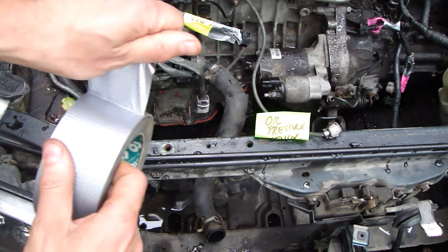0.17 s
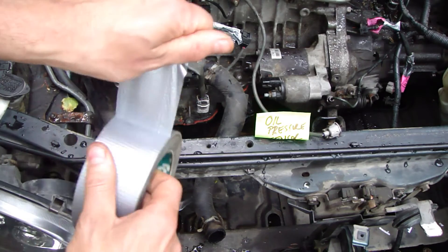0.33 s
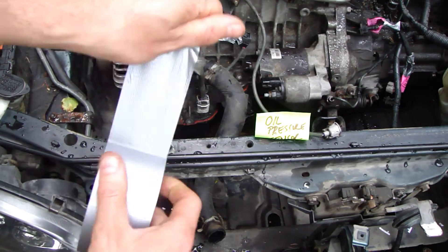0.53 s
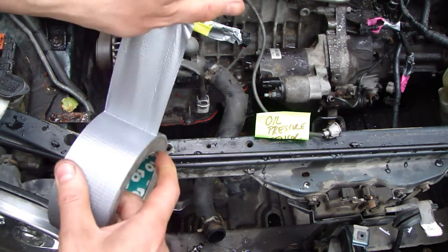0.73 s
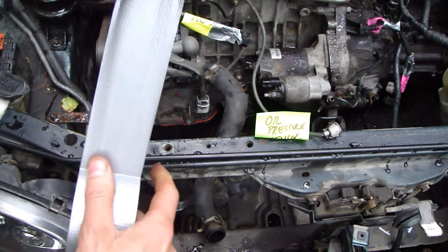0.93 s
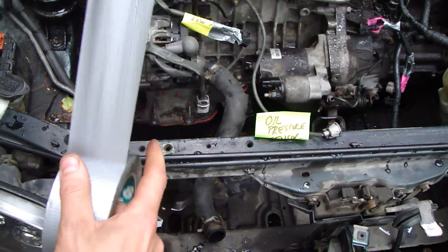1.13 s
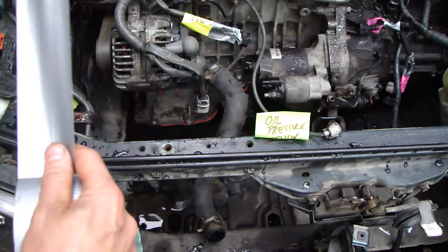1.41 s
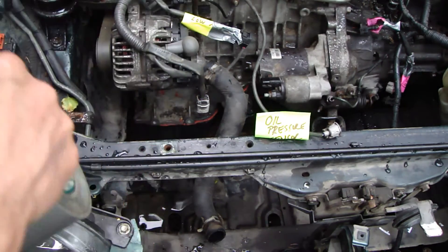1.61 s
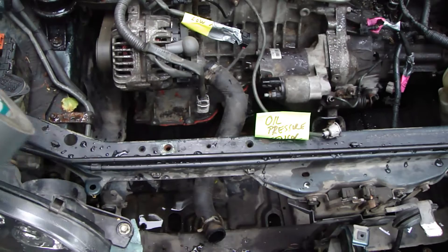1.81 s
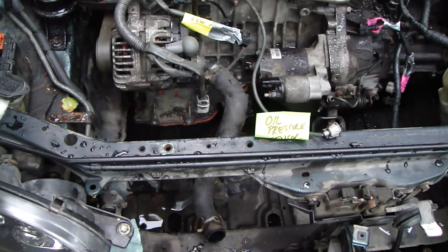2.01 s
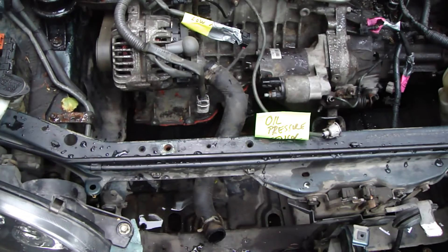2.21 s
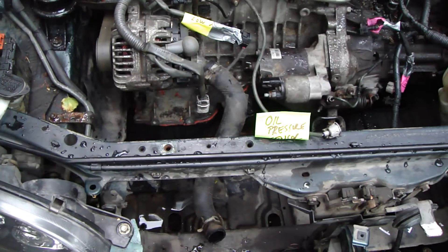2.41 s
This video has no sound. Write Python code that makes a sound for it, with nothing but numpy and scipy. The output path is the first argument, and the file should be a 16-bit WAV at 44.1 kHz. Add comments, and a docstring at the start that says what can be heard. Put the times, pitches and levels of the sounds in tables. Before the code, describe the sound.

Cloth tape is yanked off its roll in three loud, raspy crackling bursts, close and left of a small stereo microphone, then fingers rustle and tear it with quieter rips over a steady low rumble.

```python
"""Over an open engine bay, left of a small stereo microphone, wide cloth tape is pulled off its roll three times.
The glue lets go in snaps, short ringing noise pulses with rapid jittered runs at full pull, amid fine crackle;
they drive resonances that make the taut strip hum, and low jolts mark the jerks of the roll.
Fingers slide on the tape as patchy hiss, then it is nicked and ripped in dense bursts of clicks and a few snaps.
Short echoes follow from nearby metal; behind lies a wide steady rumble of coloured noise with a faint whine."""
import sys
import numpy as np
from scipy import signal
from scipy.fft import rfft, irfft
from scipy.io import wavfile

SR = 44100
rng = np.random.default_rng(int(sys.argv[2]) if len(sys.argv) > 2 else 0)


def to_wav(sig):
    """Store sig (one row per channel, or 1-D mono) as 16-bit WAV at the path in sys.argv[1].

    Samples outside -1..1 are clipped; the rate is SR.
    """
    pcm = np.clip(np.atleast_2d(sig), -1, 1) * 32767
    pcm = np.round(pcm).astype(np.int16)
    wavfile.write(sys.argv[1], SR, pcm.T)  # frames by channels


N = 112454  # samples


def from_db(db):
    """Logarithmic level: 20 dB is a factor of ten in amplitude."""
    return 10 ** (np.asarray(db) / 20)


def rms_one(x):
    """Power normalization: rms 1 along time."""
    return x / np.sqrt(np.mean(x ** 2, axis=-1, keepdims=True) + 1e-20)


def in_time(rows, column=1, outside=-120):
    """Linear interpolation of one column at every sample, constant outside its span."""
    rows = np.array(rows)
    return np.interp(np.arange(N) / SR, rows[:, 0], rows[:, column], outside, outside)


def at_hz(points, hz):
    """Interpolation of a spectrum along a logarithmic frequency axis."""
    points = np.array(points)
    return np.interp(np.log(hz + 1), np.log(points[:, 0]), points[:, 1])


def shaped(x, points):
    """Spectral weighting: each frequency is scaled by a level in dB."""
    gain = from_db(at_hz(points, np.fft.rfftfreq(N, 1 / SR)))
    return irfft(rfft(x) * gain, N)


def band(x, edges_hz):
    """Causal band-pass filtering."""
    return signal.sosfilt(signal.butter(2, edges_hz, "band", fs=SR, output="sos"), x)


def high_pass(x, order, hz):
    """Causal high-pass filtering."""
    return signal.sosfilt(signal.butter(order, hz, "high", fs=SR, output="sos"), x)


def resonance(x, hz, width_hz):
    """Damped resonance, a pole pair whose radius sets the bandwidth; gain 1 at the peak."""
    r = np.exp(-np.pi * width_hz / SR)
    poles = [1, -2 * r * np.cos(2 * np.pi * hz / SR), r * r]
    return signal.lfilter([(1 - r * r) / 2, 0, (r * r - 1) / 2], poles, x)


def grains(per_s, size_db):
    """Random point process: clicks of uneven size and sign; rms 1."""
    sizes = from_db(size_db * np.minimum(rng.exponential(1, N), 4)) * rng.choice([-1, 1], N)
    return rms_one(sizes * (rng.random(N) < per_s / SR))


def drift(rate):
    """Random modulation: lines between normal random knots, `rate` of them per second."""
    knots = int(N / SR * 400) + 2
    return np.interp(np.arange(N) / SR * rate, np.arange(knots), rng.standard_normal(knots))


def two_bands(curves, low, high):
    """Amplitude modulation of a low and a high layer by curves of level and treble share."""
    low, high = rms_one(low), rms_one(high)
    return sum(from_db(in_time(c)) * (low + from_db(in_time(c, column=2)) * high) for c in curves)


BODY_HZ, TREBLE_HZ = (589, 5350), (4910, 10750)
BODY_PEAK_HZ, BODY_PEAK_WIDTH_HZ, BODY_PEAK_DB = 2130, 1300, 3
TREBLE_PEAK_HZ, TREBLE_PEAK_WIDTH_HZ, TREBLE_PEAK_DB = 8630, 5400, 15


def body(x):
    """Broad resonance of the cloth backing within a band."""
    peak = resonance(x, BODY_PEAK_HZ, BODY_PEAK_WIDTH_HZ)
    return band(x + from_db(BODY_PEAK_DB) * peak, BODY_HZ)


def treble(x):
    """Broad high resonance of the glue line within a band."""
    peak = resonance(x, TREBLE_PEAK_HZ, TREBLE_PEAK_WIDTH_HZ)
    return band(x + from_db(TREBLE_PEAK_DB) * peak, TREBLE_HZ)


# single snaps, mostly of the glue letting go, the last few at the rips:
# t/s, body level/dB, treble level/dB, ring f/Hz
SNAP_EVENTS = [(0.1799, -29, -25, 2400), (0.1957, -36, -32, 2400), (0.2006, -35, -33, 3200),
               (0.2088, -39, -39, 4000), (0.2146, -27, -22, 2400), (0.2267, -39, -33, 2400),
               (0.2403, -18, -18, 3600), (0.2478, -32, -24, 1800), (0.2539, -33, -26, 2500),
               (0.2567, -28, -27, 2100), (0.268, -34, -25, 4200), (0.2724, -31, -29, 1700),
               (0.277, -29, -28, 2100), (0.2801, -30, -26, 1800), (0.289, -26, -21, 2100),
               (0.2909, -21, -17, 2700), (0.3002, -25, -22, 3300), (0.31, -17, -19, 2400),
               (0.3142, -21, -19, 2700), (0.3226, -12, -16, 2100), (0.3262, -24, -19, 1700),
               (0.3305, -27, -23, 1500), (0.3363, -19, -13, 2600), (0.3426, -17, -13, 1700),
               (0.3487, -11, -13, 1200), (0.4063, -11, -20, 2700), (0.412, -11, -17, 2900),
               (0.4177, -10, -16, 2400), (0.4224, -14, -17, 2600), (0.4255, -15, -14, 3100),
               (0.4306, -13, -16, 3300), (0.4376, -10, -15, 1900), (0.4682, -32, -29, 3300),
               (0.4808, -28, -23, 4000), (0.7093, -39, -32, 3100), (0.7253, -37, -28, 3500),
               (0.7314, -38, -26, 3700), (0.7384, -31, -25, 3800), (0.7498, -29, -20, 3600),
               (0.7534, -29, -23, 2600), (0.7563, -27, -21, 4000), (0.7614, -27, -24, 3400),
               (0.7636, -28, -19, 2800), (0.7695, -23, -21, 2900), (0.7735, -12, -12, 3300),
               (0.7828, -22, -16, 3300), (0.7895, -12, -11, 3000), (0.7972, -22, -17, 3200),
               (0.7998, -10, -11, 2900), (0.8803, -12, -18, 3900), (0.8844, -16, -12, 2200),
               (0.8895, -20, -16, 3600), (0.8978, -19, -13, 3400), (0.9229, -46, -36, 5000),
               (1.1347, -33, -26, 2400), (1.1497, -23, -20, 3300), (1.1517, -22, -19, 3700),
               (1.1543, -17, -19, 2500), (1.1566, -23, -18, 4300), (1.1607, -18, -16, 3600),
               (1.1625, -14, -13, 2300), (1.169, -12, -13, 3000), (1.2071, -17, -14, 2200),
               (1.2103, -18, -15, 2800), (1.2137, -17, -14, 2800), (1.2177, -24, -13, 3100),
               (1.2224, -23, -14, 2800), (1.2863, -47, -38, 2100), (1.3992, -40, -33, 2600),
               (1.4788, -41, -32, 1900), (1.4849, -41, -32, 2100), (1.5227, -43, -41, 3200),
               (1.6372, -24, -20, 2600), (2.0372, -36, -43, 2700), (2.0392, -39, -39, 2400),
               (2.4584, -36, -54, 1700), (2.4775, -36, -44, 2900), (2.4872, -30, -43, 3400)]
SNAP_RISE_S, BODY_FALL_S, TREBLE_FALL_S = .00014, .00018, .00028
SNAP_TAIL_S, SNAP_TAIL_DB = .0024, -28.5
SNAP_ROUGH, THIN_SHARE = .9, .55  # noise in the push; bass edge as a share of the ring pitch
STRIP_WIDTH_HZ, STRIP_DB = 950, 7


def snaps():
    """Impulsive excitation: short rough pushes with weak tails; the body part rings the strip's resonance."""
    rows = np.array(list(SNAP_EVENTS) + snap_runs())
    t = np.arange(768) / SR - .0006  # zero at the snap

    def envelope(fall_s):
        """Exponential rise, then a fast decay over a weak slow one."""
        falling = np.exp(-t / fall_s) + from_db(SNAP_TAIL_DB) * np.exp(-t / SNAP_TAIL_S)
        return np.where(t < 0, np.exp(t / SNAP_RISE_S), falling)

    noise = rng.standard_normal((len(rows), len(t)))
    push = (SNAP_ROUGH * noise - 1) * envelope(BODY_FALL_S)
    ring_hz = rows[:, 3:]
    hz = np.fft.rfftfreq(len(t), 1 / SR)
    ring = 1j * hz * STRIP_WIDTH_HZ / (ring_hz ** 2 - hz ** 2 + 1j * hz * STRIP_WIDTH_HZ)
    thin = (1j * hz / (THIN_SHARE * ring_hz + 1j * hz)) ** 2  # weak below the ring
    rung = irfft(rfft(push) * thin * (1 + from_db(STRIP_DB) * ring))
    rung = band(band(rung, BODY_HZ), BODY_HZ)
    bright = -treble(noise * envelope(TREBLE_FALL_S))

    out = np.zeros(N + SR)
    places = ((rows[:, :1] + t[0]) * SR).astype(int) + np.arange(len(t))
    for sound, db in ((rung, rows[:, 1]), (bright, rows[:, 2])):
        strength = np.std(sound[:, :80], axis=1, keepdims=True)  # the level holds at the onset
        np.add.at(out, places, sound / strength * from_db(db)[:, None])
    return out[:N]


# fast peeling, a rapid run of distinct snaps at a jittered rate:
# start t/s, end t/s, rate/(snaps per s), body level/dB, treble level/dB
RUN_SPANS = [(0.3537, 0.4, 272, -14, -21), (0.804, 0.878, 310, -14.5, -18.5), (1.171, 1.205, 320, -18, -17)]
# main ring of the free strip, falls in the first two pulls, nearly level in the third: t/s, f/Hz
STRIP_PITCH = [(.355, 2600), (.404, 2350), (.805, 2540), (.84, 2280), (.878, 1030), (1.172, 2520),
               (1.205, 2560)]
RUN_JITTER, RUN_SPREAD_DB, PITCH_SPREAD = .25, 2.5, .1  # log interval, level, log pitch


def snap_runs():
    """Random intervals about a mean rate: rows like SNAP_EVENTS, ringing near the pitch of the strip."""
    rows = []
    for start, end, per_s, body_db, treble_db in RUN_SPANS:
        luck = rng.standard_normal((40, 4))
        intervals = np.exp(RUN_JITTER * luck[:, 0])
        s = start + (np.cumsum(intervals) - 1) / per_s
        hz = np.interp(s, *np.transpose(STRIP_PITCH)) * np.exp(PITCH_SPREAD * luck[:, 3])
        levels = RUN_SPREAD_DB * luck[:, 1:3] + [body_db, treble_db]
        rows += [row for row in zip(s, *levels.T, hz) if row[0] < end]
    return rows


# fine crackle of glue threads, one curve per pull: t/s, body level/dB, treble level re body/dB
CRACKLE_CURVES = [
    [(.175, -59, 8), (.23, -41.5, 1.5), (.33, -30, 0), (.36, -21, -4.5), (.438, -24.5, -10),
     (.452, -33.5, -2), (.49, -50, 1), (.52, -58, -5)],
    [(.705, -55, -6), (.745, -40, 3), (.795, -23, 3.5), (.82, -21, -14), (.88, -26.5, -20), (.9, -29, 3),
     (.91, -66, -21)],
    [(1.13, -43, 0), (1.146, -41, 9), (1.156, -30, -15), (1.2, -22.5, -10), (1.222, -32, 1), (1.24, -49, 1)],
]


def crackle():
    """Random superposition: dense small grains of glue threads under each pull."""
    fine = grains(3000, size_db=3)
    return two_bands(CRACKLE_CURVES, body(fine), -treble(fine))


# humming of the taut strip: start t/s, end t/s, f/Hz, level/dB, T60/s
STRIP_HUMS = [(0.36, .395, 725, -29.5, 0.064), (0.344, 0.364, 920, -24.5, 0.028),
              (.415, .445, 382, -32.5, 0.05), (.455, .48, 350, -46, 0.084), (.3, .33, 1100, -34.5, 0.015),
              (0.756, 0.807, 375, -33.5, 0.039), (0.78, 0.856, 930, -30, 0.064),
              (0.837, .882, 743, -23.5, 0.067), (.83, 0.899, 281, -44, 0.035),
              (0.873, .895, 205, -36, 0.038), (1.159, 1.183, 1121, -25, 0.0096),
              (1.192, 1.203, 890, -21.5, 0.015), (1.164, 1.223, 401.4, -38.5, 0.0039)]


def hums(drive):
    """Forced vibration: the rectified peeling sound drives low modes of the stretched strip."""
    t, out = np.arange(N) / SR, np.zeros(N)
    for start, end, hz, db, t60 in STRIP_HUMS:
        on = (t > start) & (t < end)
        push = band(np.abs(drive) * on + 1e-18, (hz / 1.29, hz * 1.41))
        tone = resonance(push, hz, np.log(1000) / np.pi / t60)  # bandwidth from decay time
        out += from_db(db) * tone / np.std(tone[on])
    return out


# low jolts as the roll jerks: t/s, level/dB
ROLL_JOLTS = [(0.356, -52), (0.8, -35), (1.16, -28)]
JOLT_HZ = 256


def jolts():
    """Impulse response of a low-pass: dull, mainly one-sided pushes."""
    clicks = np.zeros(N) + 1e-18
    for s, db in ROLL_JOLTS:
        clicks[int(s * SR)] = from_db(db) * SR / JOLT_HZ / 2  # makes up for the low-pass
    return signal.sosfilt(signal.butter(2, JOLT_HZ, fs=SR, output="sos"), clicks)


# short rips: t/s, body level/dB, treble level re body/dB
RIP_CURVES = [
    [(1.615, -53, -6), (1.63, -40, -1), (1.636, -35, -3), (1.6385, -27.5, 2), (1.646, -38, -1),
     (1.656, -50, 0), (1.667, -37, -2), (1.671, -22.5, -4.5), (1.677, -29.5, -1.5), (1.684, -41, 5),
     (1.695, -58, 3)],
    [(2.03, -56, -7), (2.038, -41, -11), (2.058, -57, 3), (2.08, -44, -2), (2.097, -33, -4),
     (2.112, -32.5, 1.5), (2.126, -42.5, 0.5), (2.145, -62, -8)],
    [(2.445, -65, -6), (2.46, -50, -4), (2.482, -40.5, -4), (2.488, -32, -13), (2.5, -44.5, -3),
     (2.513, -67, 0), (2.535, -65, -4), (2.55, -43.5, -3)],
]
# relative spectrum of the body of a rip: f/Hz, level/dB
RIP_SPECTRUM = [(350, -42), (600, -15), (1170, -10), (2460, -2.5), (2770, -8.5), (3490, -2.5), (4360, -7),
                (5500, -11.5), (7150, -13), (12100, -120)]
RIP_RING_HZ, RIP_RING_WIDTH_HZ, RIP_RING_DB = 3290, 280, -2.5


def rips():
    """Random impulse train through a resonance: threads of the cloth parting in dense bursts."""
    threads = grains(4000, size_db=1.5)
    ring = resonance(threads, RIP_RING_HZ, RIP_RING_WIDTH_HZ)
    cloth = shaped(threads + from_db(RIP_RING_DB) * ring, RIP_SPECTRUM)
    return two_bands(RIP_CURVES, cloth, treble(threads[::-1]))  # reversed, so the layers are unlike


# fingers sliding on the tape: t/s, low level/dB, high level re low/dB
SLIDE_CURVES = [
    [(0.0, -56.5, 9), (0.016, -56, 14), (0.06, -67, -1)],
    [(0.48, -46, 19), (0.492, -43.5, -1), (0.55, -48, -2.5), (0.644, -49, 0), (0.7, -58, -3),
     (0.708, -55, 2), (0.72, -59, -7)],
    [(0.9, -47, -23), (0.91, -42, -1), (1.122, -54.5, 1.5), (1.13, -45, -5)],
    [(1.235, -52, -2), (1.249, -57, 11), (1.28, -47, 10), (1.335, -46.5, 6), (1.362, -41, 3.5),
     (1.437, -41.5, 8), (1.467, -50.5, -1), (1.477, -52, 10.5), (1.557, -51.5, -1.5), (1.609, -59, 8),
     (1.62, -38, -7)],
]
SLIDE_LOW_HZ, SLIDE_HIGH_HZ = (1200, 4900), (5370, 13200)


def slide():
    """Friction noise: soft hiss of skin on the tape, made patchy by random modulation."""
    low, high = rng.standard_normal((2, N)) * from_db(.7 * drift(60.8))
    return two_bands(SLIDE_CURVES, band(low, SLIDE_LOW_HZ), band(high, SLIDE_HIGH_HZ))


# lean of the tape to the left: f/Hz, left level re right/dB
LEFT_OVER_RIGHT = [(60, 23), (220, 8), (840, 15.5), (3140, 8), (11700, 4.5)]
RIGHT_LAG_S = .00002
SCATTER_DB, SCATTER_HZ, SCATTER_PER_S = -4, (4360, 13500), 300


def placed_left(x):
    """Interaural level and time difference: left leads; treble scatters round the microphone body."""
    hz = np.fft.rfftfreq(N, 1 / SR)
    right = from_db(-at_hz(LEFT_OVER_RIGHT, hz)) * np.exp(-2j * np.pi * hz * RIGHT_LAG_S)
    left = rfft(x) * 2 / (1 + np.abs(right))
    taps = rng.standard_normal(24) / np.sqrt(24)
    scattered = signal.lfilter(taps, 1, band(x, SCATTER_HZ))
    side = from_db(SCATTER_DB) * drift(SCATTER_PER_S) * scattered
    return irfft(np.array([left, left * right]), N) + side * [[1], [-1]]


ECHO_T60_S, ECHO_DB, ECHO_HZ = .05, -17, (500, 5900)


def echoes(x):
    """Convolution with decaying noise: short reflections off nearby metal, different on each side."""
    t = np.arange(SR // 8) / SR
    tail = rng.standard_normal((2, len(t))) * from_db(-60 * t / ECHO_T60_S) * (t > .0008)
    tail = band(tail, ECHO_HZ)
    tail = tail / np.sqrt(np.sum(tail ** 2, axis=1, keepdims=True))  # unit energy
    return from_db(ECHO_DB) * signal.fftconvolve(x[None], tail, axes=1)[:, :N]


# relative spectrum of the rumble: f/Hz, level/dB
RUMBLE_SPECTRUM = [(18, -60), (30, -8), (53, -24.5), (319, -5.5), (353, -6.5), (464, -7), (1730, -14),
                   (2170, -16), (2400, -18), (9900, -26.5), (11500, -26.5), (15000, -68), (22000, -120)]
# likeness of its two sides: f/Hz, left-right correlation (-1 is opposite phase)
SIDE_LIKENESS = [(60, -0.79), (220, -0.89), (840, -0.61), (3140, -0.57), (11700, -0.16)]
# the whine comes forward once: t/s, level change/dB
WHINE_CURVE = [(2.14, -5), (2.2, 4), (2.33, 7), (2.4, 0)]
RUMBLE_DB = -48  # of the part common to both sides
WHINE_HZ, WHINE_WIDTH_HZ, WHINE_DB = 2095, 41, -65.5


def rumble():
    """Partial coherence: distant noise largely out of phase between the sides, with a faint wavering whine."""
    alike = np.clip(at_hz(SIDE_LIKENESS, np.fft.rfftfreq(N, 1 / SR)), -1, 1)
    mid, side = rfft(shaped(rng.standard_normal((2, N)), RUMBLE_SPECTRUM))
    mid = irfft(mid * np.sqrt(1 + alike), N)
    side = irfft(side * np.sqrt(1 - alike), N)
    gain = from_db(RUMBLE_DB + .74 * drift(5.26)) / np.std(mid)

    whine = resonance(rng.standard_normal(N), WHINE_HZ, WHINE_WIDTH_HZ)
    whine = rms_one(resonance(whine, WHINE_HZ, WHINE_WIDTH_HZ))
    whine_gain = from_db(WHINE_DB + in_time(WHINE_CURVE, outside=0))
    return gain * (mid + side * [[1], [-1]]) + whine_gain * whine


def scene():
    """Linear superposition of the placed tape, its echoes and the background."""
    peel = snaps() + crackle()
    strip = high_pass(peel + hums(peel), 4, 170)
    tape = strip + jolts() + slide() + rips()
    return placed_left(tape) + echoes(tape) + rumble()


CUTOFF_HZ, BASS_CUT_HZ = 11000, 109
OVERLOAD = .8  # amplitude that flattened peaks approach


def record(dry):
    """Band limiting and saturation: top cut, highest peaks flattened, bass thinned, top cut again."""
    top_cut = signal.ellip(8, .2, 40, CUTOFF_HZ, fs=SR, output="sos")
    x = signal.sosfiltfilt(top_cut, dry)
    flat = x / (1 + (x / OVERLOAD) ** 4) ** .25
    return signal.sosfiltfilt(top_cut, high_pass(flat, 2, BASS_CUT_HZ))


dry = scene()
out = record(dry)
to_wav(out)
```